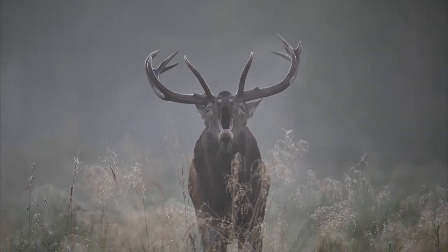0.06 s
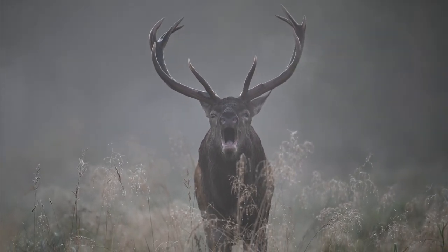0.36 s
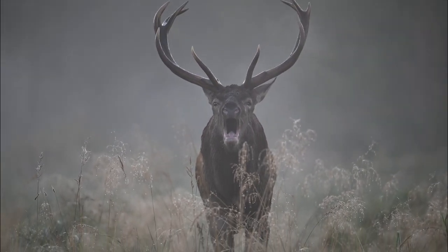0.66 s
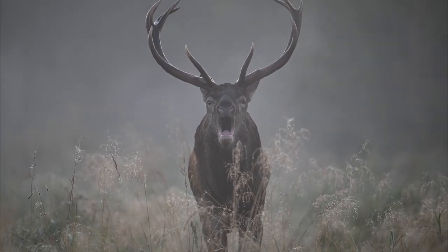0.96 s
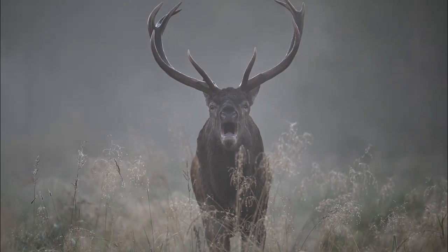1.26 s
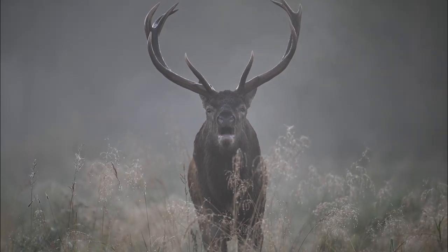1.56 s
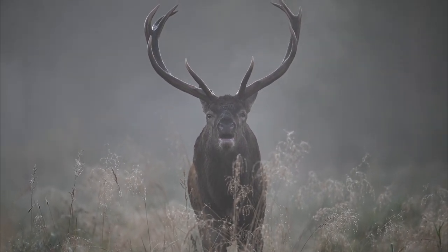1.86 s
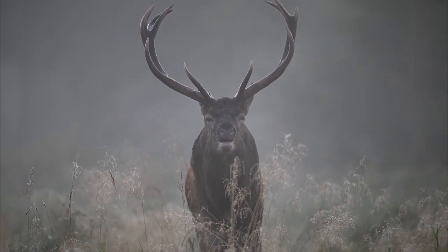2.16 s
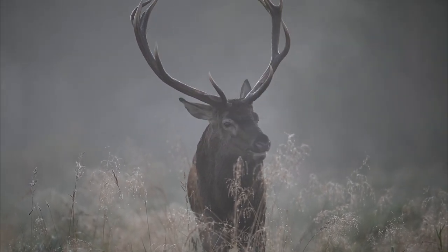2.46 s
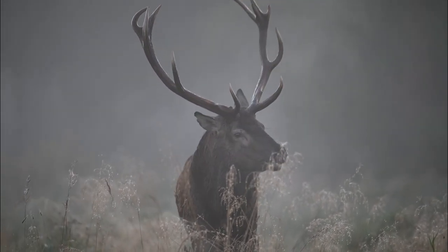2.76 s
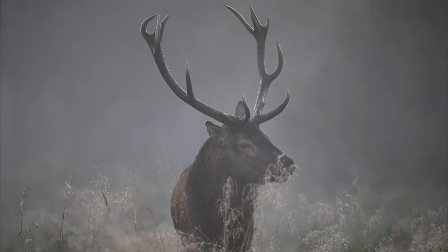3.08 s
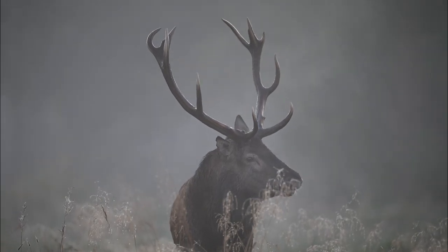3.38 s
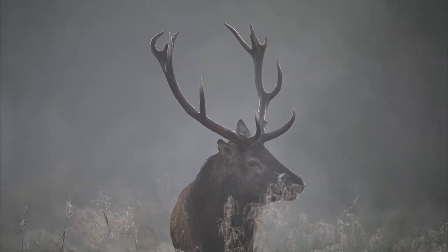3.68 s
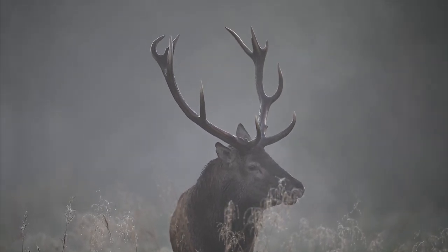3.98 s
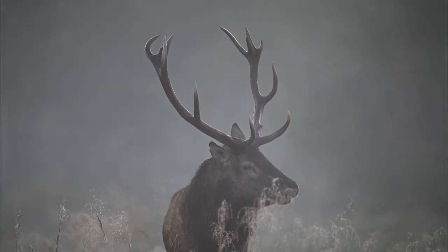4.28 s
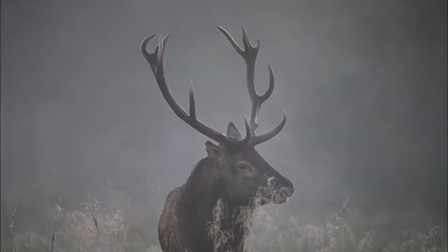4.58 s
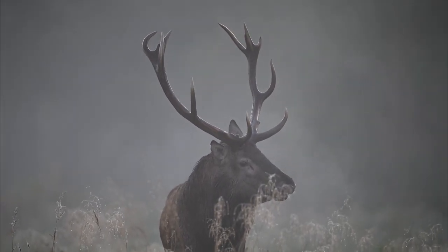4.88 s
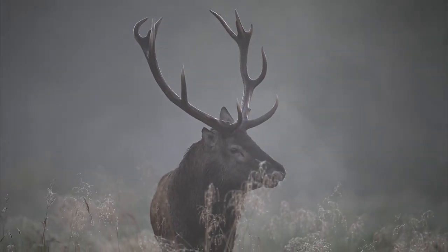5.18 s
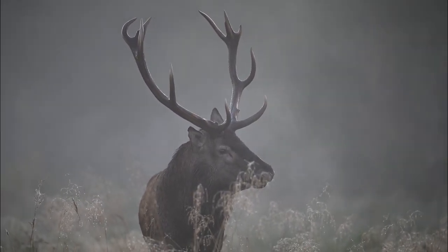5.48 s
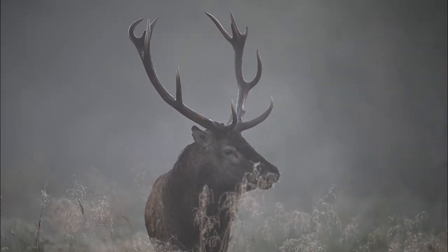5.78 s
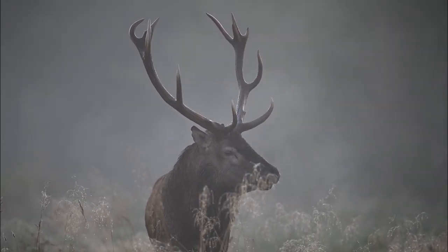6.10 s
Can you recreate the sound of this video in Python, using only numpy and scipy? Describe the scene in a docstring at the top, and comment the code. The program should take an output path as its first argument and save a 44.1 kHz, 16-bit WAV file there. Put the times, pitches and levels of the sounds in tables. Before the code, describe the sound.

A red deer stag calls from straight ahead in an open field beside a forest. Right at the start he gives a loud, deep roar that swells quickly and sinks into a rough rattle by 0.4 seconds. From 0.8 to 1.4 seconds comes a longer, lower, pulsing groan that also drops at its end. Both carry a slight breathy rasp, and a faint echo lingers in the trees. The rest is quiet. Five soft, hollow throat clucks fall at about 2, 2.7, 3.5, 4.1 and 4.6 seconds. Dry stalks tick faintly between 3.3 and 5.1 seconds, with a very light grass rustle around 4 seconds. Small distant birds give thin, brief whistles near 0.8 seconds and now and then from 2.2 to 5.4 seconds. A soft low outdoor rumble and smooth hiss continue to the end, at about 6 seconds.

```python
"""A misty field at the forest edge: a red deer stag gives a full roar that sinks into a rattle, then a
slower, pulsing groan. Each snap of his vocal folds rings his long throat and lets out a little rasp;
the grass scatters the sound and the trees throw back a faint echo. Far small birds whistle thinly.
After the calls come a few hollow clucks, ticks of dry stalks and a rustle as he brushes the grass,
all on a bed of low murmur and hiss."""
import sys
import numpy as np
from scipy import signal
from scipy.fft import rfft, irfft
from scipy.io import wavfile
from scipy.ndimage import uniform_filter1d

SR = 44100
rng = np.random.default_rng(int(sys.argv[2]) if len(sys.argv) > 2 else 0)


def persist_wave(psi):
    """Save psi, clipped to +-1, as 16-bit WAV."""
    counts = np.round(np.clip(psi, -1, 1) * 32767).astype(np.int16)
    wavfile.write(sys.argv[1], SR, np.atleast_2d(counts).T)


N = 270774

# tone of the background bed: (frequency [Hz], level [dB])
MURMUR_EQ = [(20, -5), (50, 1.5), (170, -1.5), (290, -4), (550, -3.5), (800, -5.5), (1100, -7.5),
             (1700, -11.5), (2400, -14.5), (4500, -17.5), (8000, -22.5), (12500, -27.5), (15000, -30)]
# far drones in the bed: (centre [Hz], half width [Hz], boost [dB])
FAR_DRONES = [(361.4, 16.6, 8.5), (452.6, 8, 11), (666, 33, 11.5), (1380, 144, 7)]
# high hiss, left row then right: (centre [Hz], half width [Hz], boost [dB])
HISS_PEAKS = [(10143, 1180, 11.5), (11970, 980, 9.5)]
# the bed is mono in the lows, wide on top: (frequency [Hz], left-right likeness [0-1])
MURMUR_LIKENESS = [(200, 1), (350, 0.97), (590, 0.94), (1040, 0.582), (1850, 0.043), (3300, 0.01)]

# Each call swells from a soft start to full voice and is let go. As the pitch sinks the folds go slack:
# the voice roughens and throbs, and the larynx rides up, shortening the throat.
# pitch: (time [s], pitch [Hz]); mouth: (time [s], posture [0 open to 4 spent]).
# "soft" settings act at the start, "slack" ones per share of pitch lost; treble and chest are in dB/octave.
ROAR = dict(pitch=[(0.0046, 116.2), (0.08, 114.4), (0.185, 111.9), (0.22, 107.8), (0.28, 102.2),
        (0.31, 97.58), (0.355, 92.74), (0.38, 76.1), (0.42, 55.4)], mouth=[(.18, 0.14), (.22, 1.13),
        (.28, 1.37), (.3, 1.7)],
        full_s=0.19, attack_s=0.19, swell_db=9, peak_db=23, sag_db_per_s=20, let_go_s=0.373, release_db_per_s=620, soft_treble_db=-1, soft_chest_db=6, slack_chest_db=-17.5, throat=0.97, larynx_rise=0.64, pull=0, rough=0.16, soft_rough=-.12, slack_rough=1.12, throb_db=5, rasp_db=-49, rasp_follows=0.473, tight_db=-8)
GROAN = dict(pitch=[(0.801, 61.56), (0.825, 77.1), (0.86, 81.67), (0.92, 84.5), (1.03, 81.92),
         (1.18, 81.32), (1.25, 77.27), (1.3, 71.18), (1.43, 44.86)], mouth=[(1.18, 3), (1.3, 3.835)],
         full_s=0.96, attack_s=0.18, swell_db=13, peak_db=15, sag_db_per_s=-0.5, let_go_s=1.324, release_db_per_s=274, soft_treble_db=-5, soft_chest_db=2, slack_chest_db=7, throat=0.97, larynx_rise=0.42, pull=0.029, rough=0.065, soft_rough=.05, slack_rough=0.91, throb_db=-2, rasp_db=-63, rasp_follows=1, tight_db=-8)
# throat resonances in the five postures: (centre [Hz], half width [Hz], level [dB])
THROAT_OPEN = [(130, 31, -31), (363, 54, -15.5), (834, 34.6, 5.5), (1117, 40, 5), (1640, 25, -11.5),
               (1954, 60, -15.5), (2320, 37, -17.5), (2614, 25.7, -12.5), (2937, 39, -11.5),
               (3540, 164, -23.5), (3980, 290, -34), (4880, 130, -30.5)]
THROAT_STRAINED = [(161.4, 93, -15.5), (481.3, 44, -9), (854, 15, 4), (1090, 125.6, -5.5), (1662, 29, -0.5),
                   (1954, 45, -7), (2350, 17, -10), (2660, 71, -14), (2950, 170, -17), (3380, 41, -14.5),
                   (3720, 530, -26), (4740, 414, -44)]
THROAT_CLOSING = [(189, 36.82, -7), (514, 96, -8.5), (911, 35, 10), (1308, 26, 0.5), (1790, 60, -8),
                  (2171, 84, -18.5), (2456, 34, -10), (2843, 51, -14.5), (3400, 99, -30), (3860, 130, -44),
                  (5700, 900, -40.5)]
THROAT_GROANING = [(129.5, 29, -16), (239, 51, -18), (426, 13, -15), (796, 106, -6), (1032, 67.4, -3.5),
                   (1343, 72, -2), (1466, 94, -5), (1815, 40, -4.5), (2023, 140, -6.5), (2410, 145, -7.5),
                   (2874, 106, -9.5), (3277, 34, -20), (3470, 84, -18.5), (3748, 47, -18), (4200, 240, -28),
                   (5087, 528, -36.5)]
THROAT_SPENT = [(127, 38, -15.5), (235, 47, -20), (423, 23.4, -20), (740, 103.5, -8), (1008, 50, -2.5),
                (1310, 102.4, -4.5), (1567, 90, -2), (1820, 33, -9), (2016, 150, -11), (2500, 160, -14.5),
                (2901, 160, -16.5), (3440, 101, -17), (3830, 100, -17.5), (4580, 550, -39)]
# tilt of the voice per posture, open to spent: (treble [dB/octave], chest [dB/octave])
POSTURE_TILTS = [(5, 6), (-0.5, 1.8), (7, 8.5), (1.5, 3.5), (3, 4)]
# colour of each call's rasp: (frequency [Hz], level [dB])
ROAR_RASP_EQ = [(2500, -40), (4500, -4), (5800, 2), (6300, -2), (6900, 9), (7500, -9), (8200, 6.5),
                (8800, 1), (9600, 6), (10700, -2.5), (12000, -10), (14500, -50)]
GROAN_RASP_EQ = [(2500, -32), (4500, 6.5), (5800, -1.5), (6400, -3), (6900, -1.5), (7300, -4), (7900, 7),
                 (8600, -1), (9100, 2), (9700, 2.5), (11500, -8), (14500, -39.5)]
# stereo placement of the direct voice: (frequency [Hz], left over right [dB])
STAG_PAN = [(860, 0), (1340, 0.5), (2100, -5), (3270, 4), (5000, -1)]
# tone of the forest echo: (frequency [Hz], level [dB])
ECHO_EQ = [(80, -29), (240, -32), (345, -7), (480, -10.5), (620, -15.5), (850, -22.5), (1400, -24),
           (2000, -25), (3000, -32.5), (10000, -20)]
# decay of the forest echo: (frequency [Hz], t60 [s])
ECHO_DECAY = [(100, 0.55), (380, 12.32), (900, 7.6), (2000, 2.9), (8000, 0.49)]

# far bird whistles: (time [s], length [s], pitch [Hz], glide [octaves], level [dB])
WHISTLES = [(0.757, 0.067, 6020, -0.15, -70), (2.25, 0.092, 4390, -0.0081, -73.5),
            (2.509, 0.068, 4230, -.02, -75), (2.699, 0.069, 4190, 0, -76), (2.842, .21, 4314, -0.22, -71.5),
            (3.019, .09, 2170, 0.209, -69), (4.09, 0.097, 4490, 0.0017, -68.5),
            (4.308, 0.097, 4350, -0.016, -72.5), (5.038, 0.15, 4202, -.24, -77.5),
            (5.35, .046, 4380, -.03, -75)]
# double clucks: (time [s], first knock [dB], gap [s], second knock [dB], tuning [ratio])
CLUCKS = [(1.9682, -46, 0.0027, -56, 1.06), (2.6726, -49.5, 0.0052, -42.5, 0.946),
          (3.5256, -43, 0.00322, -62, 0.97), (4.06, -56, 0.00272, -41.5, 0.9834),
          (4.579, -43.5, 0.00205, -51, 0.98)]
# hollow body of a cluck: (frequency [Hz], level [dB], t60 [s])
CLUCK_MODES = [(540, -3, 0.078), (666, -3.5, 0.059), (893, 5, 0.0307), (1117, -3, 0.035),
               (1380, -2, 0.0139), (2330, -7, 0.0054), (3300, -9.5, 0.00386), (4100, -12, 0.021),
               (7800, -10.5, 0.00425)]
# dry stalks ticking: (time [s], level [dB], centre [Hz], left over right [dB])
STALK_TICKS = [(3.303, -58.5, 10120, 5), (3.578, -62, 9415, -2.5), (3.778, -60, 11770, -16),
               (3.838, -60, 11900, -9), (4.119, -58.5, 4900, -17), (4.118, -54, 2330, -11),
               (4.476, -59, 11500, 0), (5.087, -65, 6400, 4)]


def gain_of(db):
    """Decibels to amplitude."""
    return 10 ** (np.asarray(db) / 20)


def unit_rms(x):
    """Scales to rms 1."""
    return x / np.sqrt(np.mean(x ** 2) + 1e-20)


def curve_at(points, hz):
    """Reads a curve on a log-frequency axis."""
    f, value = np.transpose(points)
    return np.interp(np.log(hz + 1), np.log(f + 1), value)


def add(mix, s, sound):
    """Drops a sound into the mix at time s."""
    part = mix[..., max(round(s * SR), 0):][..., :sound.shape[-1]]
    part += sound[..., :part.shape[-1]]


def pan(db):
    """Left and right gains for a level difference."""
    return gain_of(np.array([[.5], [-.5]]) * db)


def eq(x, points):
    """Shapes x with a curve of (frequency [Hz], gain [dB])."""
    gains = gain_of(curve_at(points, np.fft.rfftfreq(2 * N, 1 / SR)))
    return irfft(rfft(x, 2 * N) * gains)[..., :N]


def bell(x, centre, half_width):
    """Bell curve of height 1, in frequency or time."""
    return 1 / (1 + ((x - centre) / half_width) ** 2)


def field_murmur(level_db=-56.5, patchy_db=2.0):
    """The bed: a low far murmur that drifts in patches, under a smooth hiss."""
    frames, hz = N // 512 + 5, np.fft.rfftfreq(2048, 1 / SR)
    a, b, c, d, patches = rng.standard_normal((5, len(hz), frames))
    patches = unit_rms(uniform_filter1d(uniform_filter1d(patches, size=6, axis=0), size=18, axis=1))
    likeness = curve_at(MURMUR_LIKENESS, hz)[:, None]
    left = a + 1j * b
    right = likeness * left + np.sqrt(1 - likeness ** 2) * (c + 1j * d)
    murmur_db = curve_at(MURMUR_EQ, hz) + sum(db * bell(hz, f, width) for f, width, db in FAR_DRONES)
    ears_db = np.array([murmur_db + db * bell(hz, f, width) for f, width, db in HISS_PEAKS])
    drift_db = patchy_db * patches * bell(hz, 500, 1500)[:, None]
    spectra = np.array([left, right]) * gain_of(ears_db[..., None] + drift_db)
    return gain_of(level_db) * unit_rms(signal.istft(spectra, nperseg=2048, noverlap=1536)[1][:, :N])


def fold_snaps(call):
    """Times at which the vocal folds snap shut, once a pitch cycle."""
    s, pitch = np.transpose(call["pitch"])
    t = np.arange(s[0], s[-1], 1 / SR)
    cycles = np.cumsum(np.interp(t, s, pitch)) / SR
    return np.interp(np.arange(int(cycles[-1]) + 1), cycles, t)


def breath_push(call, t):
    """A call's envelope: (softness [1 to 0], release depth [dB], effort against full voice [dB])."""
    soft = np.sin(np.pi / 2 * np.clip((call["full_s"] - t) / call["attack_s"], 0, 1)) ** 2
    sag = call["sag_db_per_s"] * np.maximum(t - call["full_s"], 0)
    release = call["release_db_per_s"] * np.maximum(t - call["let_go_s"], 0)
    return soft, release, -call["swell_db"] * soft - sag - release


def larynx(call, t, throb_hz=30.9, slam_s=.349, break_s=.253):
    """Level, tone, throat tuning and grit follow the push of breath and the sinking pitch."""
    soft, release, effort = breath_push(call, t)
    s, pitch = np.transpose(call["pitch"])
    slack = 1 - np.interp(t, s, pitch) / pitch.max()
    posture = np.interp(t, *np.transpose(call["mouth"]))
    treble, chest = (np.interp(posture, range(len(tilt)), tilt) for tilt in np.transpose(POSTURE_TILTS))
    veiled = soft ** 1.6  # treble and hoarseness arrive ahead of the level
    treble += call["soft_treble_db"] * veiled - 17 * slack  # slack folds close softly
    treble -= 11.5 * bell(t, break_s, 0.011)  # the roar dulls as it breaks into a rattle
    chest += call["soft_chest_db"] * soft + call["slack_chest_db"] * slack
    chest += 0.21 * release  # the bass dies last
    # slack folds slam and falter in turn
    throb = call["throb_db"] * slack * np.cos(2 * np.pi * throb_hz * (t - slam_s))
    pull_down = call["pull"] * bell(t, call["full_s"], 0.082)  # lengthens the throat at full voice
    tuning = call["throat"] + call["larynx_rise"] * slack ** 2 - pull_down
    rough = np.clip(call["rough"] + call["soft_rough"] * veiled + call["slack_rough"] * slack, 0, 1)
    return call["peak_db"] + effort + throb, treble, chest, tuning, posture, rough


def minimum_phase(db):
    """Turns gains in dB into spectra that ring only after the hit."""
    log_gain = np.log(gain_of(np.maximum(db, -70)))
    mirrored = np.concatenate([log_gain, log_gain[:, -2:0:-1]], axis=1)
    return np.exp(np.conj(signal.hilbert(mirrored)))[:, :db.shape[1]]


def stag_voice(call, puff_s=0.013, shimmer_db=5, jitter_s=0.00037, smear_s=0.001105, size=4096):
    """Every snap of the folds, with its puff of turbulence, rings the throat in its current shape."""
    snaps = fold_snaps(call)
    db, treble, chest, tuning, posture, rough = larynx(call, snaps[:, None])
    hz, t = np.fft.rfftfreq(size, 1 / SR) + 1, np.arange(size) / SR
    # the throat morphs from one posture to the next
    postures = [THROAT_OPEN, THROAT_STRAINED, THROAT_CLOSING, THROAT_GROANING, THROAT_SPENT]
    for k, modes in enumerate(postures):
        power = sum((gain_of(level) * bell(hz / tuning, f, width)) ** 2 for f, width, level in modes)
        db = db + np.maximum(1 - abs(posture - k), 0) * 10 * np.log10(power)
    # a harder closure lifts the treble, a wider airflow pulse the bass
    db += treble * np.clip(np.log2(hz / 1000), 0, 1.5) + chest * np.clip(np.log2(700 / hz), 0, 2)
    db -= 10 * np.log10(1 + (42 / hz) ** 4)  # the mouth radiates no deep bass
    jitter, shimmer, noise = np.split(rng.standard_normal((len(snaps), size + 2)), [1, 2], axis=1)
    puff = noise * np.exp(-t / puff_s) * np.sqrt(2 / (puff_s * SR))
    drive = gain_of(shimmer_db * rough * shimmer) + rough * rfft(puff)
    delay = (snaps % (1 / SR))[:, None] + jitter_s * rough * abs(jitter)
    delay = delay + smear_s * hz / (hz + 3000)  # each snap's treble trails its bass
    rings = irfft(minimum_phase(db) * drive * np.exp(-2j * np.pi * hz * delay))
    fade = np.minimum(1, np.linspace(10, 0, size))
    out = np.zeros(N)
    for start, ring in zip(snaps, rings):
        add(out, np.floor(start * SR) / SR, ring * fade)
    return out


def breath_rasp(call, colour, burst_s, floor):
    """Hiss bursts out once a fold cycle; at full voice the folds press tight and leak less."""
    snaps, t = fold_snaps(call), np.arange(N) / SR
    since_snap = abs(t - snaps[np.maximum(np.searchsorted(snaps, t) - 1, 0)])
    sounding = (t > call["pitch"][0][0]) & (t < call["pitch"][-1][0])
    gate = (floor + np.exp(-since_snap / burst_s)) * sounding
    gate /= np.sqrt(np.mean(gate[sounding] ** 2))
    *_, effort = breath_push(call, t)
    dip_db = call["tight_db"] * bell(t, call["full_s"], 0.026)
    level = gain_of(call["rasp_db"] + call["rasp_follows"] * effort + dip_db)
    left, other = rng.standard_normal((2, N))
    return level * gate * unit_rms(eq(np.array([left, left + other]), colour))


def reverb(x, t60s, length_s, predelay_s):
    """Wet signal from sparse reflections, different at each ear; each band dies at its own speed."""
    n = int(length_s * SR)
    taps = rng.choice([-1., 1.], (2, n)) * (rng.random((2, n)) < 4000 / SR)
    hz, t, spectra = signal.stft(taps, SR, nperseg=256)
    t60 = curve_at(t60s, hz)[:, None]
    tail = signal.istft(spectra * gain_of(-60 * t / t60) / np.sqrt(t60), SR, nperseg=256)[1]
    tail = np.pad(tail / np.linalg.norm(tail[0]), ((0, 0), (int(predelay_s * SR), 0)))
    return signal.fftconvolve(x[None], tail, axes=1)[:, :N]


def outdoors(x, slap_s=0.13, blur_hz=32):
    """Direct sound, bright scatter off the grass, a dull slap from the trees and a long forest echo."""
    out = np.array([eq(x, [(f, share * db) for f, db in STAG_PAN]) for share in (.5, -.5)])
    grass = reverb(x, [(500, 0.155), (8000, 0.071)], length_s=.08, predelay_s=.001)
    grass = eq(grass, [(200, -38), (800, -9.5), (2000, 7.5), (4000, 9.0)])
    out += gain_of(-11) * (grass - 0.0277 * grass[::-1])
    add(out, slap_s, gain_of(-26) * eq(x, [(100, 9.5), (200, 5), (700, -2), (3000, -6.5)]))
    # the echo wanders between two sets of paths, which blurs its tones
    one, other = reverb(x, ECHO_DECAY, length_s=4, predelay_s=.03)
    drift = unit_rms(uniform_filter1d(rng.standard_normal(N), size=800))
    echo = (one + 1j * other) * np.exp(2j * np.pi * blur_hz * np.cumsum(drift) / SR)
    # long waves reach both ears alike
    side = eq(echo.imag, [(150, -35), (350, -33), (600, -10.5), (1000, -11.0), (2000, 4.0)])
    return out + eq(np.array([echo.real + side, echo.real - side]), ECHO_EQ)


def far_birds(arch=0.021, waver=.012, wet_db=-3, fade_db=-5):
    """Thin gliding whistles that bend up in the middle, blurred by the trees."""
    out = np.zeros(N)
    for s, length, pitch, glide, db in WHISTLES:
        progress = np.linspace(0, 1, int(length * SR))
        arc = np.sin(np.pi * progress)
        hz = pitch * 2 ** (glide * (progress - .5)) * (1 + arch * (arc - .5))
        hz *= 1 + waver * unit_rms(uniform_filter1d(rng.standard_normal(len(hz)), size=150))
        envelope = np.sqrt(abs(arc)) * gain_of(db + fade_db * (progress - .5))
        add(out, s, envelope * np.sin(2 * np.pi * np.cumsum(hz) / SR))
    return out + gain_of(wet_db) * reverb(out, [(4000, 0.23)], length_s=.4, predelay_s=0.0079)


def clucks(smack_db=-5, smack_s=0.0073):
    """Throaty clucks: two quick knocks and a short wet smack ring the same hollow modes."""
    out, t = np.zeros(N), np.arange(SR // 10) / SR
    for s, first_db, gap, second_db, tuning in CLUCKS:
        ring = sum(gain_of(db - 60 * t / t60) * np.sin(2 * np.pi * hz * tuning * t)
                   for hz, db, t60 in CLUCK_MODES)
        smack = rng.standard_normal(len(t)) * np.exp(-t / smack_s)
        smack /= np.linalg.norm(smack)
        add(out, s, gain_of(first_db) * ring)
        add(out, s + gap, gain_of(second_db) * ring)
        add(out, s, gain_of(first_db + smack_db) * signal.fftconvolve(smack, ring))
    return eq(out, [(150, -22.5), (450, -1)])


def grass_ticks(width_hz=700, t60_s=0.0108):
    """Tiny dry snaps, each a dying burst of noise in one stalk resonance."""
    out, t = np.zeros((2, N)), np.arange(SR // 20) / SR
    hz = np.fft.rfftfreq(len(t), 1 / SR)
    for s, db, centre, pan_db in STALK_TICKS:
        stalk = irfft(rfft(rng.standard_normal(len(t))) * bell(hz, centre, width_hz) ** 2, len(t))
        add(out, s, pan(pan_db) * unit_rms(stalk) * gain_of(db - 60 * t / t60_s))
    return out


def grass_rustle(peak_s=4, level_db=-74, grains_per_s=350, spread_db=4.5):
    """The stag brushes the grass as he turns: a soft, wide swell of tiny crackles."""
    sizes = gain_of(spread_db * np.minimum(rng.exponential(1, (2, N)), 4))
    grains = sizes * (rng.random((2, N)) < grains_per_s / SR)
    band = bell(np.fft.rfftfreq(N, 1 / SR), 11300, 1400) ** 2
    swell = bell(np.arange(N) / SR, peak_s, .35) ** 2
    return gain_of(level_db) * swell * unit_rms(irfft(rfft(grains) * band, N))


def scene():
    """The mix: the stag straight ahead, his rasp to the left, the field all around."""
    stag = outdoors(stag_voice(ROAR) + stag_voice(GROAN) + clucks())
    rasp = pan(11.3) * breath_rasp(ROAR, ROAR_RASP_EQ, burst_s=0.00274, floor=0.134)
    rasp += pan(13) * breath_rasp(GROAN, GROAN_RASP_EQ, burst_s=0.00267, floor=0.188)
    return stag + rasp + grass_ticks() + far_birds() + pan(-0.685) * field_murmur() + grass_rustle()


def record(dry):
    """A steep high cut at 15.1 kHz on the whole mix."""
    high_cut = signal.firwin(511, 15100, window=("kaiser", 9), fs=SR)
    return signal.oaconvolve(dry, high_cut[None], "same")


dry = scene()
out = record(dry)
persist_wave(out)
```